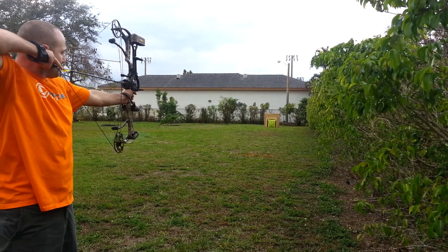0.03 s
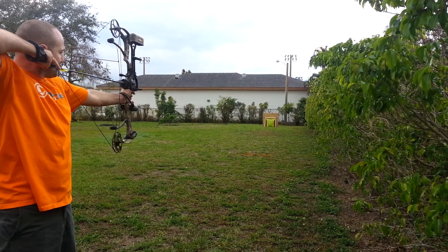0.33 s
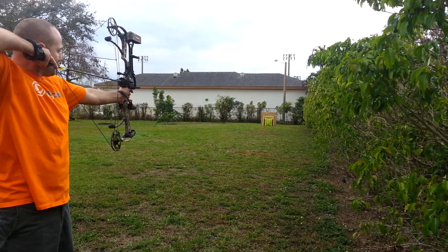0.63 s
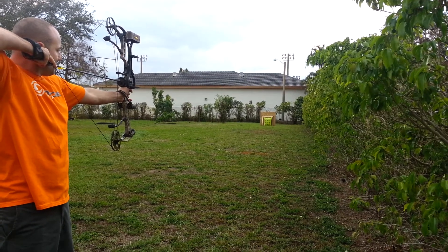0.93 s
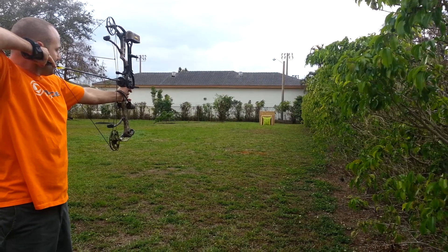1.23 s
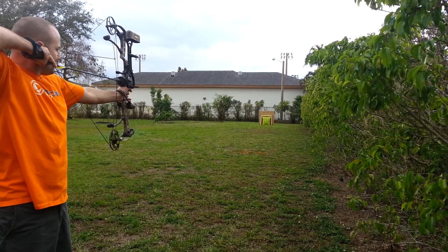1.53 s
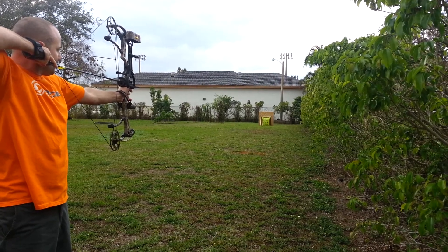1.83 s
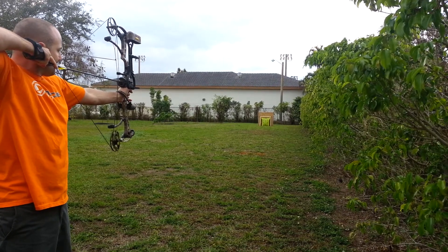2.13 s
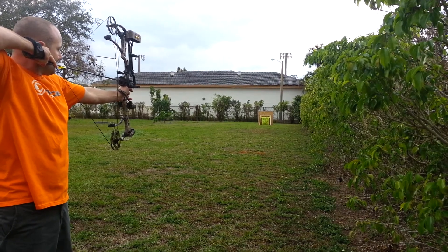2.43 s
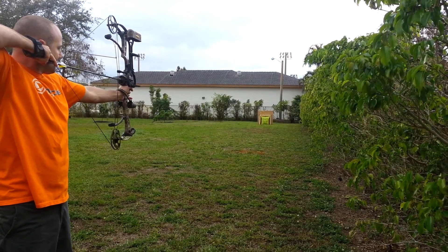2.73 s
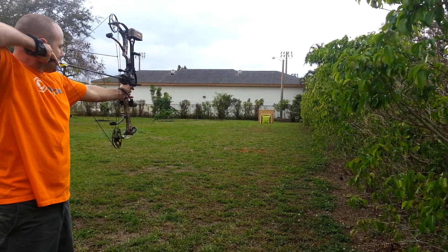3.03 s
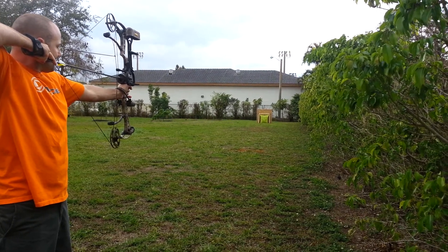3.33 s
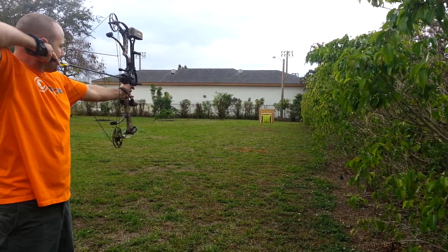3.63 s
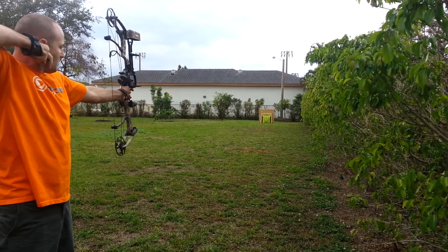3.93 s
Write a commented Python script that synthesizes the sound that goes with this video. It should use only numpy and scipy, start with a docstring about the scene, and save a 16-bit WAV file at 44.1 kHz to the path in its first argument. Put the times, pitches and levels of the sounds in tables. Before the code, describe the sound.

A compound bow fires with one sharp snap after quiet outdoor background with faint birds.

```python
"""A compound bow, held at full draw and then shot in a quiet yard.
The release clicks, the string whizzes forward and slams home; limbs, riser and fittings ring and buzz.
Hedge and walls throw the snap back as a short, bright, scattered echo.
Underneath lies a bed of distant traffic and leaves, a low machine hum and far bird whistles."""
import sys
import numpy as np
from scipy import signal
from scipy.fft import rfft, irfft
from scipy.io import wavfile

SR = 44100
rng = np.random.default_rng(int(sys.argv[2]) if len(sys.argv) > 2 else 0)


def file_out(sig):
    """Save sig as 16-bit WAV at sys.argv[1]."""
    # one column per channel
    cols = np.atleast_2d(sig).T
    # limit, then scale
    lim = np.clip(cols, -1, 1)
    pcm = np.round(lim * 32767).astype(np.int16)
    wavfile.write(sys.argv[1], SR, pcm)


N = 176400
T = np.arange(N) / SR
FREQS = np.maximum(np.arange(N // 2 + 1) * SR / N, 1)
SIDES = np.array([[1], [-1]])  # left, right
SLAM_S = 3.8513  # the main hit


def undb(db):
    """Decibels to gain."""
    return 10 ** (np.asarray(db) / 20)


def unit(x):
    """Scale to rms 1."""
    return x / np.sqrt(np.mean(x ** 2))


def curve(points):
    """Join (f/Hz, value) points on a log-frequency axis."""
    hz, value = np.array(points).T
    return np.interp(np.log(FREQS), np.log(hz), value)


def noise(colour):
    """Coloured noise of rms 1, unrelated left and right."""
    return unit(irfft(rfft(rng.standard_normal((2, N))) * undb(curve(colour)), N))


def drift(rate):
    """Smooth random modulator of rms 1, moving about rate times a second."""
    return unit(irfft(rfft(rng.standard_normal(N)) / (1 + (FREQS / rate) ** 4), N))


def grain(rate, depth):
    """Fast random gain of rms 1 that roughens a texture."""
    return unit(np.exp(depth * drift(rate) / 2))


def decay(start, t60):
    """Hard attack, then a fall of 60 dB every t60 seconds."""
    return (T >= start) * np.exp(-np.log(1000) * np.maximum(T - start, 0) / t60)


def pan(db):
    """Left and right gains for a level difference."""
    return undb(SIDES * db / 2)


def click(start, colour):
    """One minimum-phase impulse of unit energy with the given colour."""
    cepstrum = irfft(np.log(undb(curve(colour))), N)
    shape = irfft(np.exp(rfft(2 * cepstrum[:N // 2], N)), N)
    placed = np.interp(np.arange(N) - round(start * SR), np.arange(N), shape, left=0)
    return placed / np.sqrt(np.sum(shape ** 2))


# EQ of the traffic and leaves: f/Hz, level/dB
AIR_COLOUR = [(20, -42), (35, -32), (55, -5.5), (85, -9.5), (140, -4.5), (190, -1.5), (300, -5.5),
              (600, -9.5), (870, -6.5), (1250, -14), (1900, -15), (3000, -19.5), (4500, -23), (6300, -30.5),
              (9500, -26.5), (14500, -28)]
# Stereo likeness of the bed: f/Hz, L-R correlation
AIR_CORRELATION = [(60, 0.75), (130, .9), (290, 0.62), (640, 0.49), (1400, 0.078), (3000, 0.024)]
# Lean of the bed: f/Hz, L-R/dB
AIR_PAN = [(110, 1.5), (700, -.5), (1300, -2), (2400, -4.5), (4400, -1), (8000, 1.5)]

def air():
    """Far traffic and leaves: a bed narrow in the bass and wide on top, each octave flickering a little."""
    mid, side = rfft(noise(AIR_COLOUR))
    likeness = curve(AIR_CORRELATION)
    stereo = (mid * np.sqrt(1 + likeness) + side * np.sqrt(1 - likeness) * SIDES) * pan(curve(AIR_PAN))
    bed = np.zeros((2, N))
    for octave in range(4, 16):
        band = np.maximum(1 - abs(np.log2(FREQS) - octave), 0)
        bed += irfft(stereo * band, N) * undb(.8 * drift(6.6))
    return undb(-50.5 + .1 * drift(1)) * unit(bed)


def machine_hum(hz=119.8):
    """A machine's low tone, wavering in level and phase."""
    level = undb(-56) * (1 + .34 * drift(6))
    return level * np.sin(2 * np.pi * hz * T + .5 * drift(2.9))


# Bird calls: t/s, length/s, start f/Hz, end f/Hz, level/dB
BIRD_CALLS = [(0.514, 0.074, 941, 965, -58.5), (0.831, 0.04, 950, 960, -58.5),
              (1.632, 0.108, 1493, 1520, -62), (1.632, 0.089, 2245, 2284, -63), (1.691, .12, 760, 720, -60),
              (2.001, 0.089, 1335, 1380, -58), (2.15, .07, 1375, 1357, -65), (2.566, .2, 1857, 2020, -63),
              (3.07, 0.075, 1774, 1770, -61), (3.28, 0.05, 1780, 1756, -61), (3.633, .08, 2750, 2710, -68)]

def birds():
    """Thin gliding whistles off to the right, blurred by distance."""
    calls = np.zeros(N)
    waver = 1 + .016 * drift(38)
    for start, length, start_hz, end_hz, db in BIRD_CALLS:
        along = np.clip((T - start) / length, 0, 1)
        hz = (start_hz + (end_hz - start_hz) * along) * waver
        arch = np.sqrt(2 * abs(np.sin(np.pi * along)))
        calls += undb(db) * arch * np.sin(2 * np.pi * np.cumsum(hz) / SR)
    tail = rng.standard_normal((2, N)) * decay(0, t60=.27)
    reverb = signal.fftconvolve(calls[None], unit(tail) / np.sqrt(N), axes=1)[:, :N]
    return (calls + .63 * reverb) * pan(db=-5)


# Slaps off the walls: t/s, level/dB, t60/s, L-R/dB
WALL_SLAPS = [(3.9108, -24, 0.038, -1), (3.9142, -26, 0.017, -7), (3.9278, -22.5, .01, 7)]
# Bright EQ of slaps and hedge: f/Hz, level/dB
SLAP_COLOUR = [(150, -33), (600, -13), (1400, -18), (2400, -4), (3400, 2), (4800, -4.5), (6300, -27),
               (9000, -29), (14500, -48)]
# Darker EQ of the yard's tail: f/Hz, level/dB
TAIL_COLOUR = [(100, -12), (450, -2.5), (1200, -2), (3300, -5), (5000, -7), (6500, -12.5), (14500, -32)]

def echoes(hedge_s=3.912, attack_s=.017):
    """The snap comes back: distinct slaps, grainy scatter from the hedge and the yard's faint tail."""
    slaps = sum(undb(db) * decay(start, t60) * pan(pan_db) for start, db, t60, pan_db in WALL_SLAPS)
    attack = np.clip((T - hedge_s) / attack_s, 0, 1)
    hedge = undb(-24.5) * attack * decay(hedge_s, t60=.25) * pan(db=-2) * grain(rate=300, depth=.5)
    early = np.hypot(slaps, hedge) * noise(SLAP_COLOUR)  # the envelopes add in power
    tail = undb(-32) * decay(SLAM_S, t60=.6) * noise(TAIL_COLOUR)
    return early + tail


# Ticks ahead of the hit: t/s, level/dB, t60/s
RELEASE_TICKS = [(3.8262, -37.5, 0.091), (3.839, -25, 0.03)]
# Their crisp EQ: f/Hz, level/dB
RELEASE_COLOUR = [(500, -16), (2800, -13), (4200, -1.5), (5400, -9), (6500, -18), (8800, -11), (11500, -18),
                  (13700, -7), (15000, -14)]

def release():
    """Small clicks as the release opens and the string starts to move."""
    envelope = sum(undb(db) * decay(start, t60) for start, db, t60 in RELEASE_TICKS)
    return envelope * noise(RELEASE_COLOUR)[0]


# EQ of the buzz: f/Hz, level/dB
FITTINGS_COLOUR = [(80, -23), (180, -14), (300, -7.5), (900, -5), (1300, -5), (2300, -1.5), (3500, -0.5),
                   (5000, -5.5), (6300, -18), (9500, -12.5), (14500, -20)]

def fittings():
    """The hit shakes the fittings into a short, grainy buzz; returns mid and side."""
    return undb(-14) * decay(SLAM_S, t60=.099) * grain(rate=460, depth=.41) * noise(FITTINGS_COLOUR)


# EQ of the rasp in the whizz: f/Hz, level/dB
WHIZZ_COLOUR = [(100, -14), (400, 7), (1000, -11), (2000, -4), (3400, -5), (4600, 6), (6200, -22),
                (10000, -15), (14500, -20)]

def whizz(start_s=3.8425, length_s=.0063, fade_s=.0035, start_hz=1610, end_hz=3660, rise_db=37):
    """String and arrow gather speed: a rough climbing tone and a rasp swell until the arrow leaves."""
    age = T - start_s
    travel = np.clip(age / length_s, 0, 1)
    hz = start_hz * (end_hz / start_hz) ** travel
    swell = (age > 0) * undb(-4 - rise_db * (1 - travel))
    fade_out = np.exp(-np.maximum(age - length_s, 0) / fade_s)
    tone = (1 + .15 * drift(970)) * np.sin(2 * np.pi * np.cumsum(hz) / SR)
    rasp = undb(-11) * noise(WHIZZ_COLOUR)[0]
    return swell * fade_out * (tone + rasp)


# Ringing modes of the bow: f/Hz, level/dB, t60/s
RING_MODES = [(106, -37, .12), (256.4, -15.5, .07), (386.5, -25.5, 0.15), (458, -15, 0.074),
              (770, -23.5, 0.062), (876, -28, 0.086), (1400, -43, .09), (1748, -22, 0.17),
              (2208, -25, 0.08), (2630, -24, .09), (2950, -29, .1), (3080, -33, 0.15), (3560, -13.5, 0.074),
              (3850, -24, 0.09)]
# EQ of the crack: f/Hz, level/dB
SLAM_COLOUR = [(50, -33), (120, -13), (250, 2.5), (450, 0.5), (800, 3.5), (1400, -10), (2800, 3.5),
               (4200, -14), (6000, -19), (7500, -6.5), (15000, -15)]

def slam():
    """The string hits its stop: a crack with a spray of noise, and limbs, string and riser ring."""
    ring = np.zeros(N)
    for k, (hz, db, t60) in enumerate(RING_MODES):
        ring += (-1) ** k * undb(db) * decay(SLAM_S, t60) * np.sin(2 * np.pi * hz * (T - SLAM_S))
    crack = -undb(10) * click(SLAM_S, SLAM_COLOUR)
    spray = undb(-15) * decay(SLAM_S, t60=.01) * noise(SLAM_COLOUR)[0]
    return ring + crack + spray


# Stereo placement of the bow: f/Hz, L-R/dB
BOW_PAN = [(100, -3), (220, 1), (1200, 2), (2200, -7), (4400, -7), (8000, -4), (14000, -1.5)]

def bow(low_cut_hz=70, wide_above_hz=1500, width=.81, left_lag_s=.000129):
    """The whole shot: little deep bass radiates, the buzz spreads the treble, the right side leads."""
    ticks = release()
    buzz_mid, buzz_side = fittings()
    low_cut = signal.butter(3, low_cut_hz, "high", fs=SR, output="sos")
    mid = signal.sosfilt(low_cut, ticks + whizz() + slam() + buzz_mid)
    treble = FREQS ** 4 / (FREQS ** 4 + wide_above_hz ** 4)
    stereo = rfft(mid) + width * treble * rfft(buzz_side) * SIDES
    lag = np.exp(-2j * np.pi * FREQS * np.array([[left_lag_s], [0]]))
    return irfft(stereo * lag * pan(curve(BOW_PAN)), N)


def scene():
    """The shot and its echoes over the yard's quiet ambience."""
    return bow() + echoes() + air() + machine_hum() + birds()


def record(dry):
    """Master chain: hard clipping at full scale, then a steep low-pass at 14.7 kHz."""
    low_pass = signal.ellip(10, .2, 70, 14700, fs=SR, output="sos")
    return signal.sosfilt(low_pass, np.clip(dry, -1, 1))


dry = scene()
out = record(dry)
file_out(out)
```